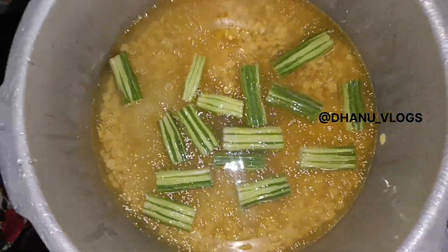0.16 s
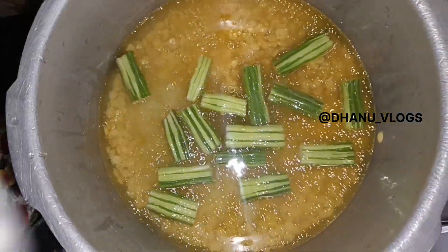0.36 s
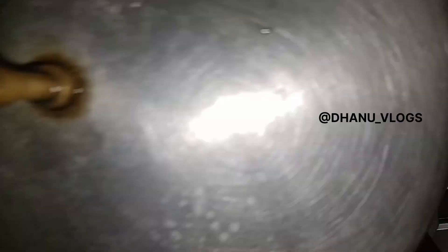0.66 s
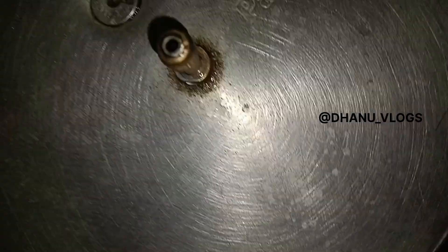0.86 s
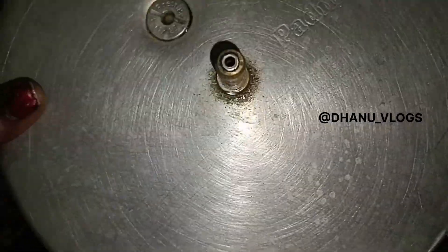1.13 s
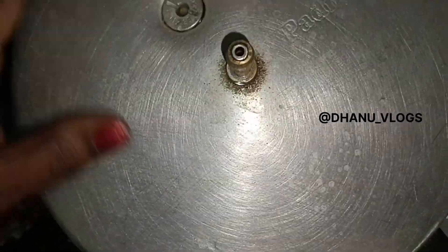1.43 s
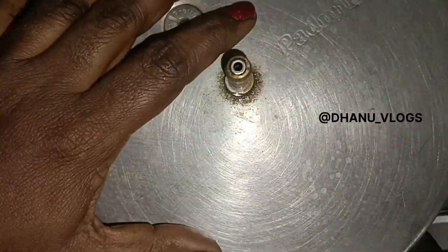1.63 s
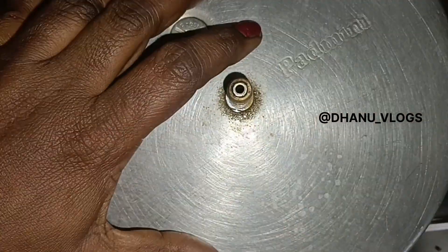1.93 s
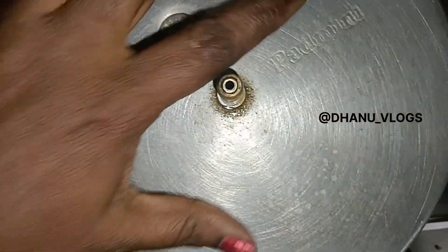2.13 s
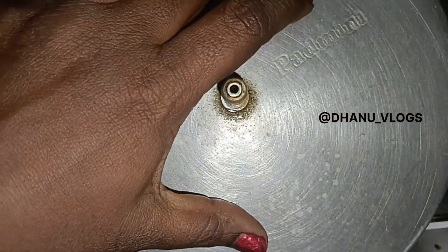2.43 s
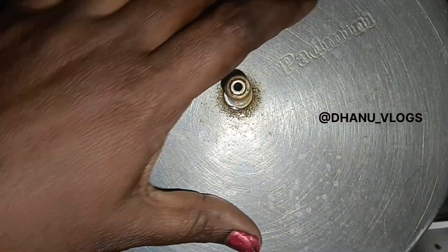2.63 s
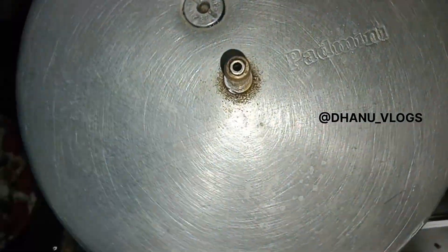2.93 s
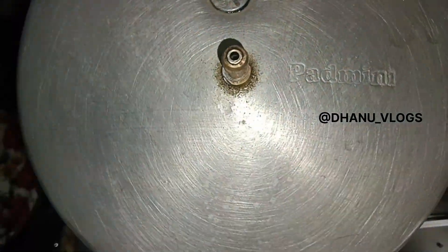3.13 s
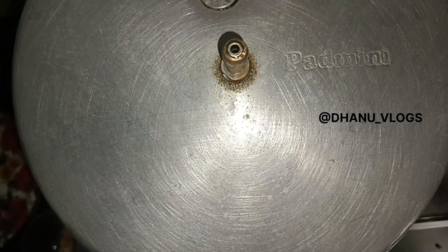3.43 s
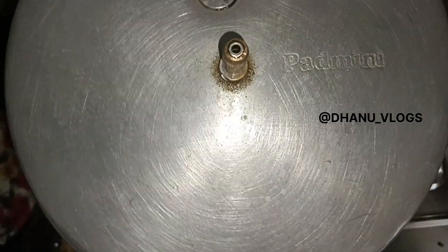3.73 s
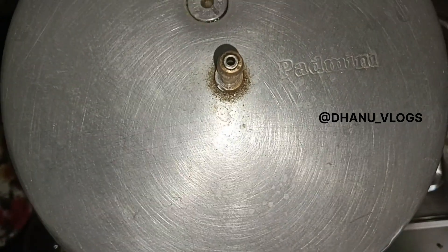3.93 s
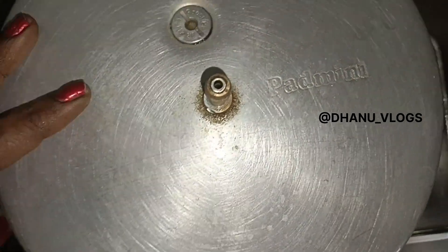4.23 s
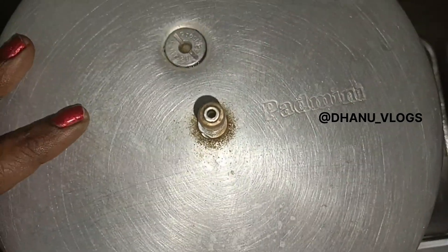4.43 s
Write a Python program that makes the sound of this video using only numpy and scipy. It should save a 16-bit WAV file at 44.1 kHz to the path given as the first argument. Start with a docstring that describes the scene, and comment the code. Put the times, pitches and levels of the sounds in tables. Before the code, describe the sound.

Close, uneven clanks and scrapes of a lid being fitted on an aluminium pressure cooker, over a faint room hum.

```python
"""A small kitchen, a phone's stereo microphone close above an aluminium pressure cooker.
The room hums and hisses, with faint, short, thin flickering tones near 3 kHz. The lid is set on its pot:
the rims knock, chatter and grind, and pot and lid ring briefly, damped by the hand and the water.
Late on, a hand slides over the metal with a high hiss."""
import sys
import numpy as np
from scipy import signal
from scipy.fft import rfft, irfft, next_fast_len
from scipy.io import wavfile
from scipy.ndimage import uniform_filter1d, minimum_filter1d

SR = 44100
rng = np.random.default_rng(int(sys.argv[2]) if len(sys.argv) > 2 else 0)


def wav_record(signal):
    """Record a signal, one row per channel, as 16-bit PCM in the file named by sys.argv[1]."""
    frames = np.transpose(np.atleast_2d(signal))
    bounded = np.clip(frames, -1, 1)
    # unit amplitude maps onto the largest positive 16-bit level
    quanta = np.round(bounded * 32767).astype(np.int16)
    wavfile.write(sys.argv[1], SR, quanta)


N = 201272


def amp(db):
    return 10 ** (np.asarray(db) / 20)

def unit_rms(x):
    return x / np.sqrt(np.mean(x ** 2) + 1e-20)

def along(points, hz):
    """Read (Hz, value) points on a log axis."""
    f, v = np.transpose(points)
    return np.interp(np.log(hz + 1), np.log(f + 1), v)

def filtered(x, response):
    m = next_fast_len(N + SR // 2)
    return irfft(rfft(x, m) * response(np.fft.rfftfreq(m, 1 / SR)), m)[..., :N]

def patchy_noise(spectrum, likeness, patchy_db):
    """Stereo noise whose level flickers in patches of time and pitch."""
    z = signal.stft(rng.standard_normal((2, N)), nperseg=512)[2]
    patches = uniform_filter1d(rng.standard_normal(z.shape[1:]), size=10, axis=0)
    patches = unit_rms(uniform_filter1d(patches, size=6, axis=1))
    pair = signal.istft(z * amp(patchy_db * patches), nperseg=512)[1][:, :N]
    turn = lambda hz: np.arccos(np.clip(along(likeness, hz), -1, 1)) / 2
    mid, side = filtered(pair, lambda hz: amp(along(spectrum, hz)) * [np.cos(turn(hz)), np.sin(turn(hz))])
    return unit_rms(np.array([mid + side, mid - side]))


# The kitchen's air, all round the microphone: (frequency [Hz], relative density [dB])
ROOM_SPECTRUM = [(25, 8.5), (65, -3), (100, 4.5), (200, -12.5), (330, -9), (650, -11), (1100, -15.5),
                 (2200, -10.5), (3300, -6.5), (4100, -11), (4500, -25), (5800, -17), (6800, -14.5),
                 (8200, -21), (10500, -10.5), (12500, -17), (15700, -39)]
# Its likeness at the two microphone ports: (frequency [Hz], correlation [-1..1])
ROOM_LIKENESS = [(60, 1), (240, 0.99), (950, 0.018), (3770, -0.054), (15000, -0.034)]

def room_tone(level_db=-52.5):
    """The kitchen's steady hum and hiss, a little to the left."""
    return amp(level_db) * amp([[1.5], [-1.5]]) * patchy_noise(ROOM_SPECTRUM, ROOM_LIKENESS, patchy_db=2.2)


# The clearer thin tones: (peak time [s], pitch [Hz], level [dB], half length [s])
THIN_TONES = [(0.131, 3200, -50.5, 0.045), (.435, 3350, -49, 0.027), (1.45, 2970, -49.5, 0.021),
              (2.5, 3280, -51.5, 0.017), (2.614, 3370, -50, 0.019), (2.86, 3180, -50, 0.015),
              (4.496, 3000, -47, 0.026)]

def thin_tones(faint_count=70):
    """Short, slightly rising tones, unlike in phase left and right; fainter ones fall at random."""
    faint = rng.random((faint_count, 4)) * [N / SR, 1500, 9, .04] + [0, 2500, -66, .02]
    t = np.linspace(-1, 1, 4001) * 4001 / 2 / SR
    out = np.zeros((2, N + SR))
    for s, hz, db, half_length in [*THIN_TONES, *faint]:
        arc = (t / half_length) ** 2
        tone = np.sin(2 * np.pi * hz * t + 3 * arc + rng.uniform(0, 2 * np.pi, (2, 1)))
        out[:, round(s * SR):][:, :len(t)] += amp(db) * np.exp(-4 * arc) * tone
    return out[:, len(t) // 2:][:, :N]


RING_T = np.arange(SR // 3) / SR
SIDES = np.reshape([.5, -.5], (2, 1, 1))  # left, right
# The cooker, close under the microphone: (frequency [Hz], left port over right [dB])
LEFT_BIAS = [(60, -3), (300, -0.5), (800, -1.5), (2400, 6.5), (5000, 2), (12000, 22.5)]

def port_balance(hz, pan_db):
    """Level at each port in dB; long waves hardly follow the pan."""
    return SIDES * (along(LEFT_BIAS, hz) + pan_db * hz / (hz + 400))


# Modes of pot and lid: (frequency [Hz], relative level [dB], base time to fall 60 dB [s])
COOKER_MODES = [(101.6, 10, 0.31), (150, 3, 0.16), (178.8, 7, 0.16), (268.4, -1.5, 0.26), (356.1, 2, 0.16),
                (395.4, -3, 0.077), (443.4, -9.5, 0.16), (531, -16.5, 0.12), (634, -9.5, 0.085),
                (700.2, -3, 0.054), (840.5, -0.5, 0.03), (989, 2, 0.018), (1040, -12, 0.15),
                (1109, -10.5, 0.09), (1229, -2, 0.083), (1314, -9, 0.25), (1575, -1, 0.096),
                (1683.4, -2.5, 0.075), (1920, -27, 0.1), (2147, 0, 0.13), (2420, -48, 0.021),
                (2731.4, -2, 0.077), (2688, -10.5, 0.17), (2980, -15, 0.18), (3000, -9.5, 0.26),
                (3630, -29, 0.14), (3960, 2, 0.053), (4400, -6.5, 0.046), (4934, 5, 0.029),
                (5380, -4.5, 0.23), (6370, 7.5, 0.029)]
# Their phase at the microphone: (frequency [Hz], lead of the left port [rad])
LEFT_LEAD = [(60, 0), (450, .15), (750, -.6), (1200, -1.8), (2200, -4.8), (3900, -11.3), (6000, -16)]

def clear_modes(colour, ring_scale, scatter_db, favour_db, pan_db, taps, blow_share, chatter_s):
    """Pot and lid ring from a blow; the taps after it feed each mode and jolt its phase."""
    t = RING_T
    hz, db, t60 = np.transpose(COOKER_MODES)[:, :, None]
    hz = hz * (1 + .006 * rng.standard_normal(hz.shape))  # grip and seating shift each mode
    # each port faces another patch of the lid, so short waves arrive with unlike phase
    phase = SIDES * (along(LEFT_LEAD, hz) + hz / (hz + 900) * rng.standard_normal(hz.shape))
    level_db = db + favour_db + along(colour, hz) + port_balance(hz, pan_db)
    # the struck spot varies each mode's strength, pushing some and pulling others
    level_db = level_db + scatter_db * rng.standard_normal(hz.shape)
    phase = phase + np.pi * rng.integers(2, size=hz.shape)
    jolts = np.cumsum(1.35 * taps * rng.standard_normal((len(hz), len(taps))), axis=1)
    phase = phase + uniform_filter1d(np.pad(jolts, [(0, 0), (0, len(t) - len(taps))], "edge"), size=24)
    loss, feed = 2 * np.log(1000) / (ring_scale * t60), 2 / chatter_s
    tap_energy = feed * (np.exp(-loss * t) - np.exp(-feed * t)) / (feed - loss)
    energy = blow_share * np.exp(-loss * t) + (1 - blow_share) * tap_energy
    envelope = np.sqrt(np.abs(energy)) * (1 - np.exp(-t * hz / 0.24)) ** 2
    return np.sum(amp(level_db) * envelope * np.sin(2 * np.pi * hz * t + phase), axis=1)


# Dense weak modes with the kitchen's answer: (frequency [Hz], time to fall 60 dB [s])
SWARM_DECAY = [(200, 0.31), (600, 0.28), (1500, 0.22), (4000, 0.32), (8000, 0.18), (15000, 0.057)]

def mode_swarm(colour, swarm_db, pan_db, taps, blow_share):
    """The blow and each tap set off a crack and a wash of weak modes, heard as dying noise."""
    t = RING_T
    hz, frame_s, z = signal.stft(rng.standard_normal((2, len(t))), SR, nperseg=128)
    hz = hz[:, None]
    apart = np.clip(hz / 900, 0, 1)  # long waves reach both ports alike
    z = [z[0], np.sqrt(1 - apart ** 2) * z[0] + apart * z[1]]
    crack = amp(9 - 60 * frame_s / 0.021)
    decay = amp(-60 * frame_s / along(SWARM_DECAY, hz)) + crack
    band = hz / (hz + 500) / (1 + (hz / 9000) ** 3)
    gain = amp(swarm_db + along(colour, hz) + port_balance(hz, pan_db)) * band
    swarm = signal.istft(z * gain * decay, SR, nperseg=128)[1][:, :len(t)]
    hits = np.r_[np.sqrt(blow_share), taps[1:]]
    return signal.fftconvolve(swarm * (1 - np.exp(-t / 0.001)), hits[None], axes=1)[:, :len(t)]

def wall_tail(modes, t60=0.21, low_cut_hz=480):
    """The near walls return the ringing as a blurred tail with little bass."""
    t = RING_T
    walls = rng.standard_normal((2, len(t))) * amp(-60 * t / t60) * (t > .003)
    walls[1] = 0.54 * walls[0] + 0.81 * walls[1]
    walls = signal.lfilter(*signal.butter(1, low_cut_hz, "high", fs=SR), walls / np.linalg.norm(walls[0]))
    return amp(-4) * signal.fftconvolve(modes, walls, axes=1)[:, :len(t)]

def metal_ring(colour, ring_scale, scatter_db, swarm_db, chatter_s=1e-4, favour_db=0, pan_db=0):
    """The cooker's answer to one blow and the small uneven taps that follow it."""
    early = RING_T[:SR // 10]
    blow_share = 1 / (1 + (chatter_s / 0.011) ** 3)  # 11 ms of chatter carries as much as the blow
    taps = rng.standard_normal(len(early)) * (rng.random(len(early)) < .06) * np.exp(-early / chatter_s)
    taps = np.sqrt(1 - blow_share) * taps / (np.linalg.norm(taps) + 1e-12)
    modes = clear_modes(colour, ring_scale, scatter_db, favour_db, pan_db, taps, blow_share, chatter_s)
    swarm = mode_swarm(colour, swarm_db, pan_db, taps, blow_share)
    onset = 1 - np.exp(-RING_T / (.08 * chatter_s))
    return (modes + wall_tail(modes) + swarm) * onset

def blow_colour(clank_db, rise, fall, thud_db, thud_hz, foot_hz=592, knee_hz=2310, edge_hz=3310):
    """(Hz, dB) points of a blow: the rims' broad clank plus the hollow pot's narrow thud."""
    hz = np.geomspace(80, 16000, num=120)
    over = lambda corner: np.log2(hz / corner).clip(0)  # octaves
    under = lambda corner: np.log2(corner / hz).clip(0)
    clank = clank_db - 22.5 * under(foot_hz) - rise * under(knee_hz)
    clank = clank - 8 * over(knee_hz) - fall * over(edge_hz)
    thud = thud_db - 14.5 * under(thud_hz) - 66 * over(thud_hz)
    thud = thud - 10 * (1 - np.exp(-(np.log(hz / thud_hz) / 0.23) ** 2))  # favours the nearest pot mode
    return list(zip(hz, 20 * np.log10(amp(clank) + amp(thud))))


# Lid meeting pot, close under the microphone: (time [s], clank [dB], rise to its knee [dB/octave],
# fall past its edge [dB/octave], thud [dB], thud pitch [Hz], pan left [dB], chatter [s],
# rim ring time [factor], pot ring time [factor], lift of five rim regions, low to high [dB each])
LID_CONTACTS = [(0.158, -40.5, 9, 49, -51, 370, 5, 0.0056, 1, 1, 10, -7, 0, -10, 10.5),
                (0.169, -30, 11.5, 86, -42.5, 352, 1.5, 0.0047, 0.67, 0.89, 17.5, 3.5, 3, -1.5, 3),
                (0.235, -28, 20, 7, -72, 380, -13, 0.0067, 0.19, .3, 0, 5, -6, -8, -3),
                (0.243, -22.5, 9.5, 9.5, -55, 300, 2.5, 0.028, 0.38, 0.85, 6, 3, 4.5, 9, 8.5),
                (0.266, -28.5, 6.5, 19, -71, 380, 3.5, 0.013, 0.39, 0.84, 10, 11, -10, -15, 13),
                (0.31, -39.5, 8, 20, -60, 690, 13, 0.027, 0.5, .5, -5, 3, -4, 8, 8),
                (0.787, -26.5, -5, 16, -9, 403, 0, 0.0056, 0.5, 0.74, 3.5, -2.5, 7, -6.5, 2.5),
                (0.813, -48, -3, 7, -24, 450, 1, 0.0031, 0.63, 1.9, -6, -6, 0, -9, -7),
                (0.893, -33, 3, 32, -28, 376, -2.5, 0.0064, 0.43, 0.44, 14, 16.5, 0, 15.5, 14.5),
                (0.917, -26.5, -4.5, -0.5, -13.5, 366, -3.5, 0.0056, 0.55, 0.58, 8, 1, 6, 3, -20),
                (0.939, -17.5, -2.5, 9, -18.5, 370, -3.5, 0.0026, 0.53, 1.1, 9, 3, 2, -2, 3),
                (0.951, -60, 0, 12, -5, 270, -3, 0.024, 0.42, 0.57, 0, 2, -2, -2, -3),
                (0.959, -25, 1.5, 2, -26, 366, -1, 0.0018, 0.73, 0.52, -5, 11.5, 7.5, 4, 9),
                (0.985, -32, -2.5, 8, -27.5, 366, 3.5, 0.034, 0.55, 0.86, 8, 6, 5, 8, 6),
                (1.064, -24.5, -7, -2, -7.5, 329, -4, 0.0025, 0.59, 0.22, 7.5, 3.5, 5, -2, 9),
                (1.088, -33.5, -0.5, 8, -21, 252, 9.5, 0.013, 0.75, 1.2, 5, 10.5, 7, 11.5, -8),
                (1.213, -29.5, -5, 2, -17.5, 290, -5.5, 0.013, 0.29, .4, -20, -12, -15, -9, 1),
                (1.256, -24.5, 2, -0.5, -40, 202, -3.5, 0.012, 0.57, 1.05, -2, 5, -3, -0.5, 2),
                (1.296, -43.5, -11, 16, -41, 370, 2.5, 0.0089, 0.53, 0.83, 6, -10, 3, 1, 9),
                (1.302, -35, 38, 22, -27, 157.6, 13, 0.0092, 0.94, 0.53, 0, 0, 0, -13, -10),
                (1.428, -83, -6, 18, -29.5, 455, -1, 0.015, 0.45, 0.5, -7, -5, 0, 0, 0),
                (1.72, -45, -1, -1, -23, 710, -1, 0.011, .7, 0.81, 0, 4, 0, 1, 2),
                (1.741, -30, -6.5, -2.5, -22, 280, -3, 0.011, 0.44, 0.52, -5, 0, -1, -16, 9),
                (1.753, -34, -11, 3, -24.5, 370, -1.5, 0.022, 0.43, 0.43, -7, 0, 2, 0, -7),
                (1.77, -27, 8, 7.5, -20, 183, 6.5, 0.01, 0.69, 0.64, 19, -1, -4, -11, -7),
                (1.803, -46.5, -9, -3, -25.5, 190, -1, 0.0057, 1, 1.2, 11.5, -9, -3, 5, 0),
                (2.035, -44, -5, 17, -29.5, 353, -4, 0.031, .9, 0.63, 0, -9, 0, 7, 7),
                (2.05, -18.5, 2.5, 13, -21.5, 340, -2, 0.0015, 0.3, 0.68, 13, -11, -4, 9, 2.5),
                (2.057, -30.5, 1.5, 16, -22, 334, 7, 0.016, 0.68, .6, -6, -10, -6, 1, -3),
                (2.152, -68, 6, 12, -40, 267, 3, 0.008, .5, 0.84, 0, 0, 0, 0, 0),
                (2.356, -57.5, 4.5, 6, -29, 360, -4, 0.015, 0.82, 0.74, 12, 16, -3, 4, -7),
                (2.363, -80, -3, 6, -31.5, 183, -7, 0.015, 0.9, 0.69, 0, 0, -2, 2, -2),
                (3.024, -24.5, 10, 14, -24, 700, -3, 0.005, 0.35, 1.05, 11, 14.5, 0, 1.5, 3),
                (3.058, -43.5, 6, 7, -38, 272, 21, 0.052, 0.29, 0.27, -6, -14, 4, -13, -19),
                (3.173, -47, -3, 31, -30, 160, 2.5, 0.0065, 0.98, 1.2, -2, 3, 11, -11, -10),
                (3.193, -31, 3.5, 17, -26, 260, -2.5, 0.012, 0.19, 0.44, -15, 8, -6, 4.5, 4),
                (3.231, -30, 0, 7, -15, 245.4, -3.5, 0.028, 0.15, 0.42, -10, 14.5, 1, 3, 9),
                (3.281, -27.5, 1.5, 5.5, -31.5, 346, -2.5, 0.0029, 0.37, 0.89, 12, -4, -5, 11.5, -1),
                (3.304, -38.5, 13, 6, -47, 355, 5, 0.0066, 0.32, 0.56, 0, -6, -6, 1, 5),
                (3.344, -69, 10, 5, -14.5, 138.3, 9, 0.018, 0.13, 0.092, 0, 0, 0, 0, 0),
                (3.409, -36, 1.5, 22, -33.5, 326, -6, 0.0039, 0.43, 0.94, -6, 14.5, 0, 6, 4),
                (3.425, -21, 9.5, 6.5, -33.5, 111, 1, 0.013, 0.11, .12, -11, -4, -3, 7.5, 0.5),
                (3.533, -23, 5, 5.5, -36, 383, -9, 0.016, 0.15, 0.32, 0, 2, 0, -18, -20),
                (3.541, -21, -3, 6, -13.5, 393, 3.5, 0.014, 0.18, 0.063, 0, -15, -15, 3, 7.5),
                (3.668, -38.5, -9, 0, -28, 99.7, -3, 0.0097, 0.28, 0.52, -5, 13, -3, 9.5, 9),
                (3.682, -45.5, -10.5, -2, -28, 445, 4, 0.019, 0.36, 0.76, 7, 0, -5, -1, 0),
                (3.725, -38, 3.5, 34, -29.5, 149, 5, 0.015, 0.18, 0.31, 3, 1, 10.5, -10, -18),
                (4.156, -62, 3, 12, -27, 686, 2, 0.0019, 0.46, 0.73, -6, -6, 0, -6, -8),
                (4.18, -23, 0, 17, -37, 770, -0.5, 0.0039, 0.54, 0.3, -8, -1.5, 2.5, -17, -2),
                (4.192, -42.5, -4.5, 45, -29, 387, 9, 0.0088, 0.7, 0.42, 0, -12, 5, 2, -10),
                (4.263, -24.5, 3.5, 21, -65, 390, -5.5, 0.0062, 0.33, 0.3, 3, 1.5, -4, -26, -3),
                (4.299, -27, 20, 26, -33, 455, 1, 0.016, 0.57, .55, 7, 6, -2, -9, -1),
                (4.353, -36.5, 16, 3, -39.5, 169.4, -4, 0.0067, 0.26, 0.27, 12, 17, 0, -17, 12.5)]
RIM_REGIONS_HZ, RIM_LOG_WIDTH = [1010, 1215, 1630, 2270, 2840], 0.087
POT_BELOW_HZ = 760  # higher modes belong to the rims

def lid_knocks():
    """The lid strikes and chatters; the grip damps it, and where it lands favours some rim regions."""
    out = np.zeros((2, N + SR))
    hz = np.transpose(COOKER_MODES)[0][:, None]
    regions = np.exp(-(np.log(hz / RIM_REGIONS_HZ) / RIM_LOG_WIDTH) ** 2)
    for s, clank_db, rise, fall, thud_db, thud_hz, pan_db, chatter_s, rim, pot, *lift_db in LID_CONTACTS:
        colour = blow_colour(clank_db, rise, fall, thud_db, thud_hz)
        ring_scale = np.where(hz < POT_BELOW_HZ, pot, rim).clip(.1)
        knock = metal_ring(colour, ring_scale, scatter_db=1.6, swarm_db=3, chatter_s=chatter_s,
                           favour_db=regions @ np.c_[lift_db], pan_db=pan_db)
        out[:, round(s * SR):][:, :knock.shape[1]] += knock
    return out[:, :N]

def strokes(rows, part):
    """Gain of one part: each stroke swells 30 dB over its rise, holds, and drops 30 dB over its fade."""
    t, gain = np.arange(N) / SR, 0
    for s, rise, hold, fade, *levels_db in rows:
        away = np.maximum((s - t) / rise, (t - s - hold) / fade).clip(0)
        gain = gain + amp(levels_db[part] - 30 * away)
    return gain


# Rim dragged on rim, close up:
# (time at full strength [s], rise [s], hold [s], fade [s], low [dB], dull [dB], bright [dB])
RIM_DRAGS = [(0.96, .02, 0.046, 0.07, -34, -40, -43.5), (1.075, .01, .03, 0.11, -39, -48, -42),
             (1.74, 0.037, 0.047, 0.094, -40, -38.5, -42), (2.64, 0.13, 0.32, 0.15, -63.5, -61, -68),
             (3.01, 0.1, 0.023, 0.22, -40, -34.5, -54), (3.17, 0.037, 0.065, .03, -56, -45, -58),
             (3.24, .04, .06, .08, -60, -52, -50.5), (3.69, 0.03, 0.035, 0.17, -44.5, -41, -58),
             (4.126, 0.13, 0.1, 0.029, -50.5, -45.5, -48), (4.29, 0.013, 0.085, 0.1, -48.5, -44.5, -46),
             (4.5, 0.11, 0.052, 0.05, -66, -60, -64)]

def rim_grind(waver_db=4, waver_s=.03):
    """Rough rims slip under wavering pressure; their grains ring the metal, low, dull and bright."""
    low = [(200, -30), (270, -17), (365, -25), (445, -6), (540, -5), (700, -35), (4000, -60)]  # (Hz, dB)
    dull = [(360, -33), (540, -14.5), (690, -6.5), (900, -43), (2000, -24), (4000, -50)]
    bright = [(700, -17), (2000, -25), (3000, 7), (4200, 7), (5000, -7), (9000, -9.5)]
    rings = [metal_ring(low, ring_scale=0.5, scatter_db=1.5, swarm_db=-30),
             metal_ring(dull, ring_scale=0.8, scatter_db=6.5, swarm_db=-31),
             metal_ring(bright, ring_scale=0.23, scatter_db=2.5, swarm_db=32)]
    out = 0
    for part, ring in enumerate(rings):
        pressure = unit_rms(uniform_filter1d(rng.standard_normal(N), size=round(waver_s * SR)))
        grains = rng.standard_normal(N) * amp(5 * rng.standard_normal(N) + waver_db * pressure)
        rubbed = unit_rms(signal.fftconvolve(ring, grains[None], axes=1)[:, :N])
        out = out + rubbed * strokes(RIM_DRAGS, part)
    return out


# A hand on the metal, close up:
# (time at full strength [s], rise [s], hold [s], fade [s], hiss [dB], sheen [dB])
HAND_STROKES = [(3.07, 0.11, 0.051, 0.46, -54.5, -60), (3.43, 0.015, 0.0032, 0.089, -39, -67),
                (3.55, 0.057, 0.0039, 0.11, -48, -68)]
# The skin's hiss and the sheen on top of it: (frequency [Hz], relative density [dB])
SKIN_SPECTRUM = [(3000, -24), (5000, 20), (8000, 13), (10500, 23.5), (13000, 21), (15000, -4), (15700, -12)]
SHEEN_SPECTRUM = [(10000, -32), (13000, -3), (15000, 2), (15700, -4)]

def hand_slide():
    """Sliding fingers hiss in the treble, nearer the left port."""
    likeness = [(5000, .19)]
    hiss = strokes(HAND_STROKES, part=0) * patchy_noise(SKIN_SPECTRUM, likeness, patchy_db=1.2)
    sheen = strokes(HAND_STROKES, part=1) * patchy_noise(SHEEN_SPECTRUM, likeness, patchy_db=1.2)
    return amp([[4], [-1.5]]) * (hiss + sheen)

def scene():
    """The kitchen as heard from just above the cooker."""
    return room_tone() + thin_tones() + lid_knocks() + rim_grind() + hand_slide()

def record(dry, low_cut_hz=55, ceiling=.55, top_hz=15750):
    """The phone loses the deep bass, limits the peaks and cuts off the highest treble."""
    x = filtered(dry, lambda hz: (1j * hz / (low_cut_hz + 1j * hz)) ** 3)
    needed = np.minimum(1, ceiling / (np.abs(x).max(axis=0) + 1e-9))
    gain = uniform_filter1d(minimum_filter1d(needed, size=441), size=221)
    return filtered(x * gain, lambda hz: hz < top_hz)


dry = scene()
out = record(dry)
wav_record(out)
```